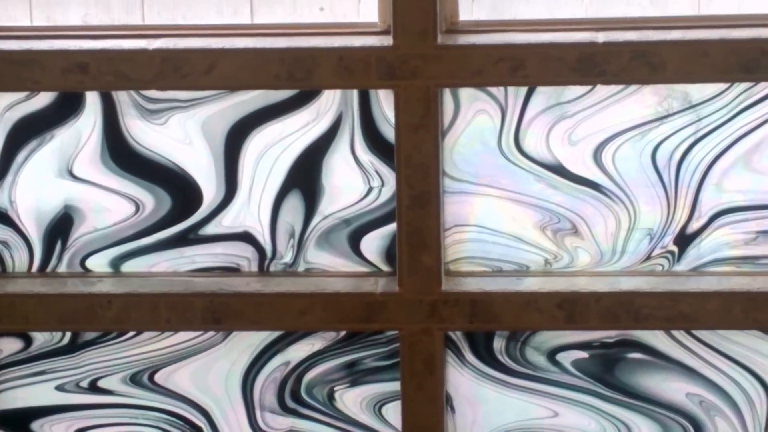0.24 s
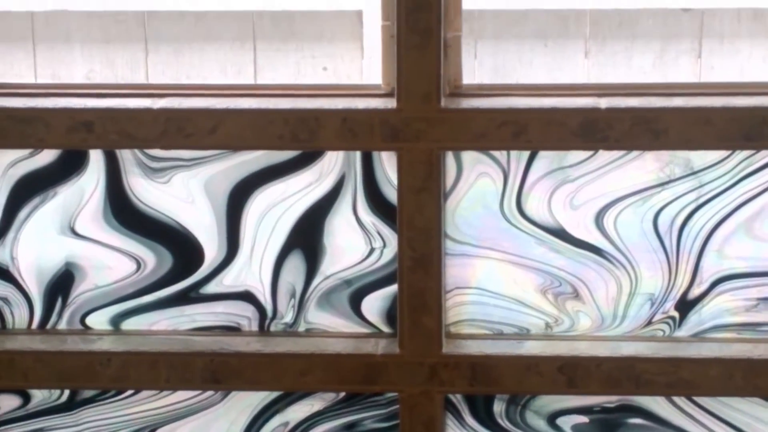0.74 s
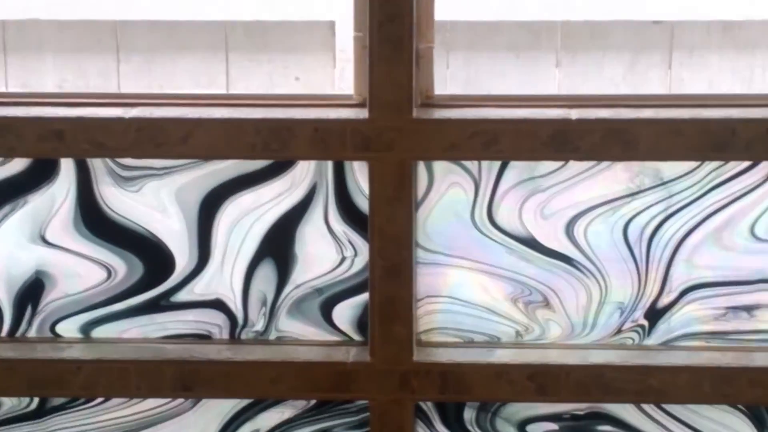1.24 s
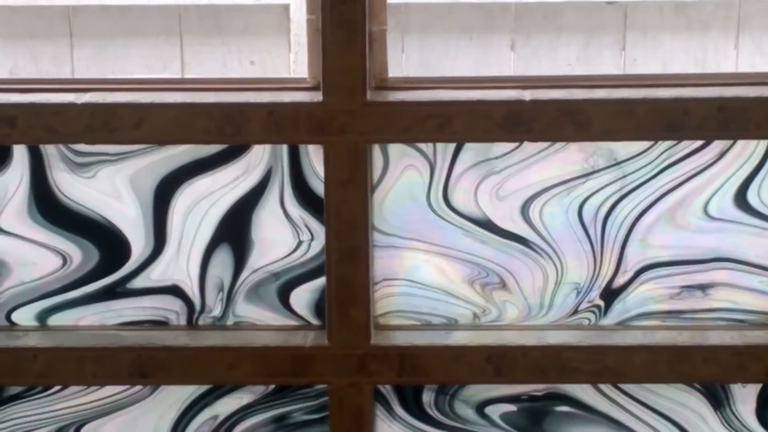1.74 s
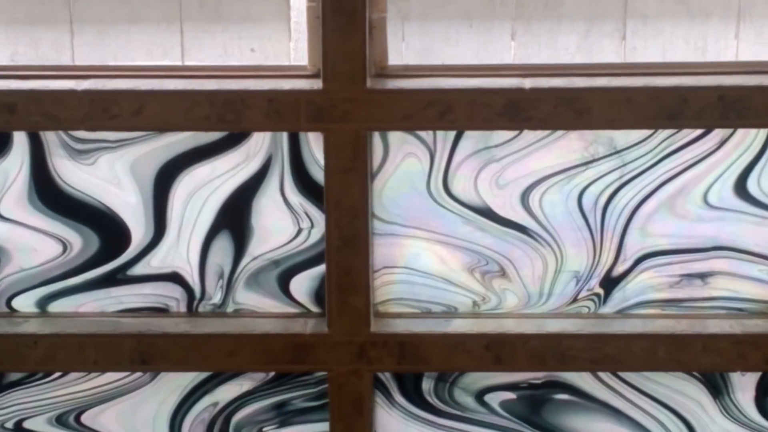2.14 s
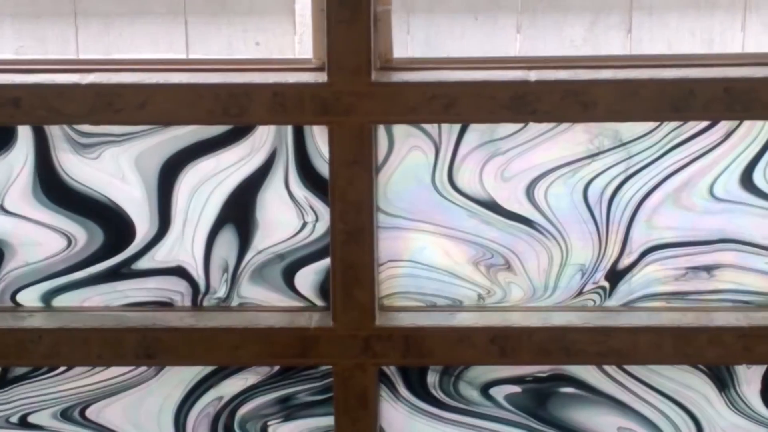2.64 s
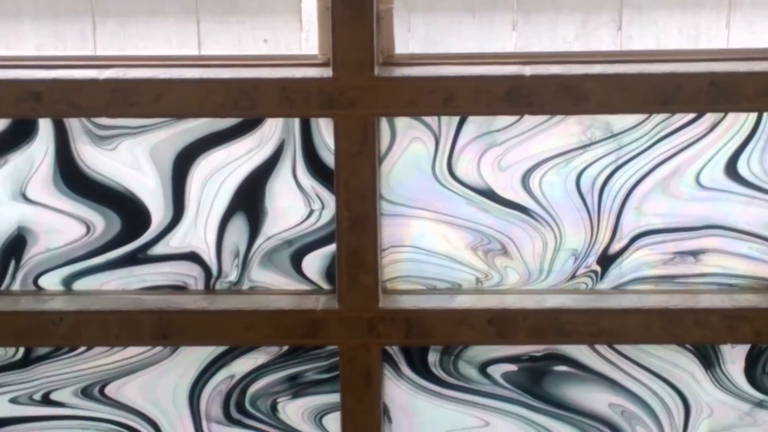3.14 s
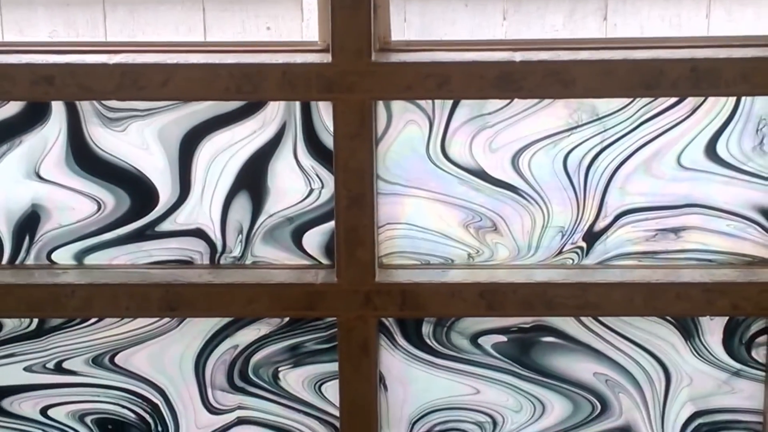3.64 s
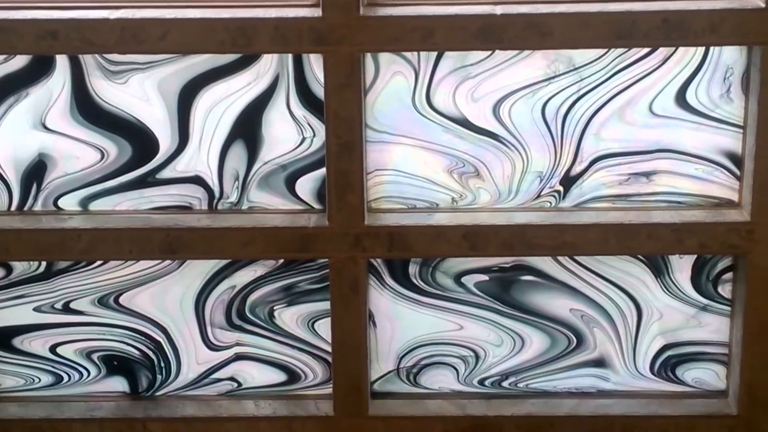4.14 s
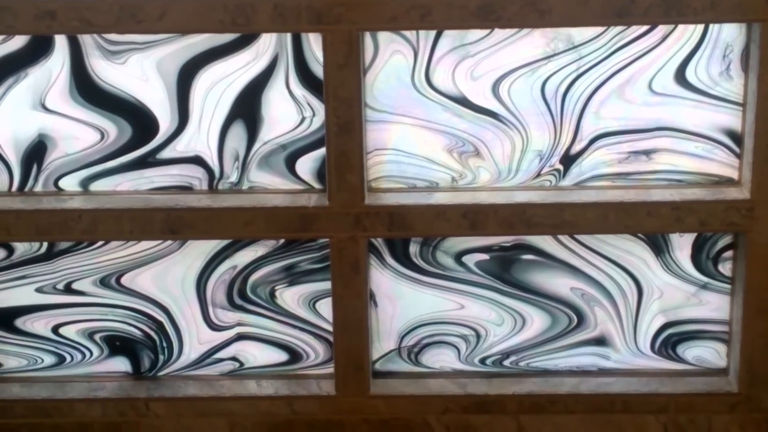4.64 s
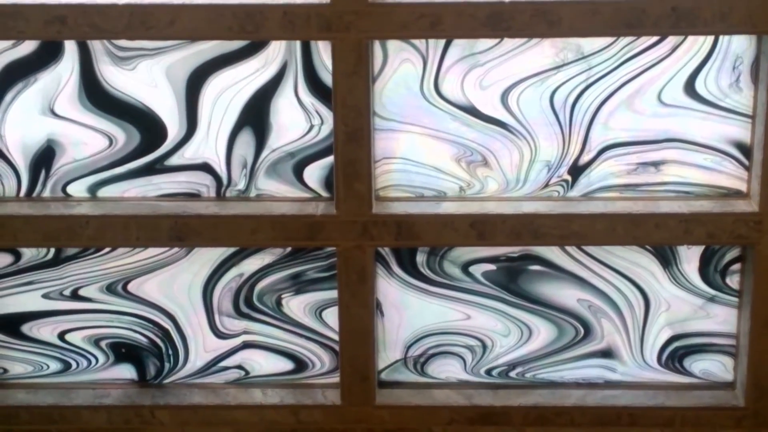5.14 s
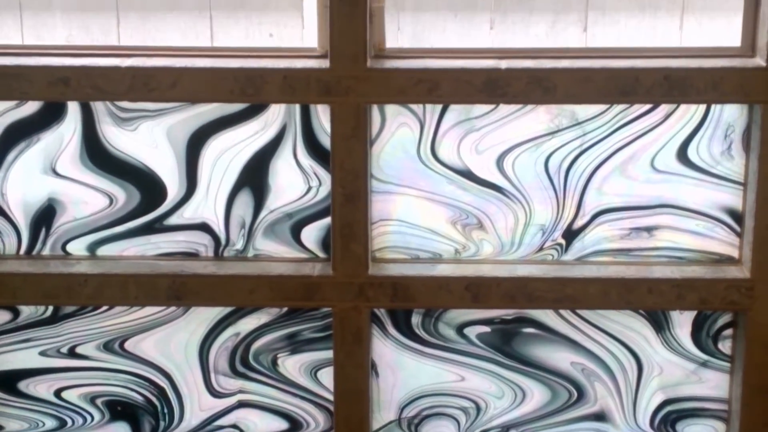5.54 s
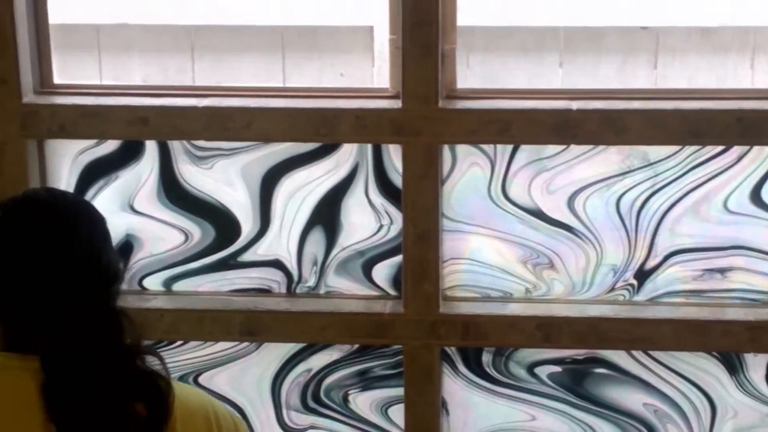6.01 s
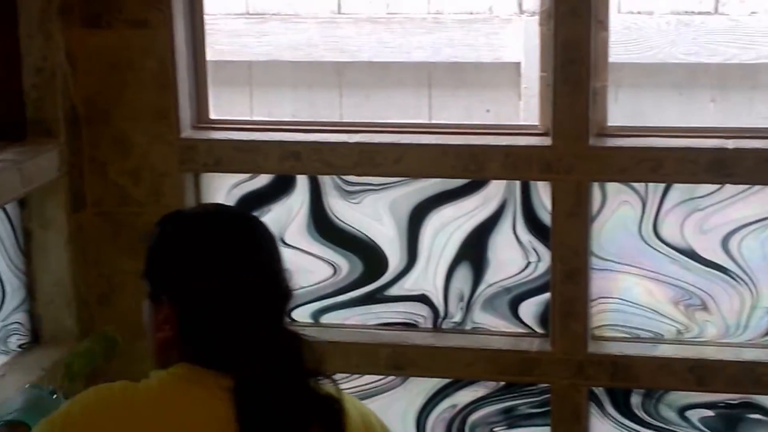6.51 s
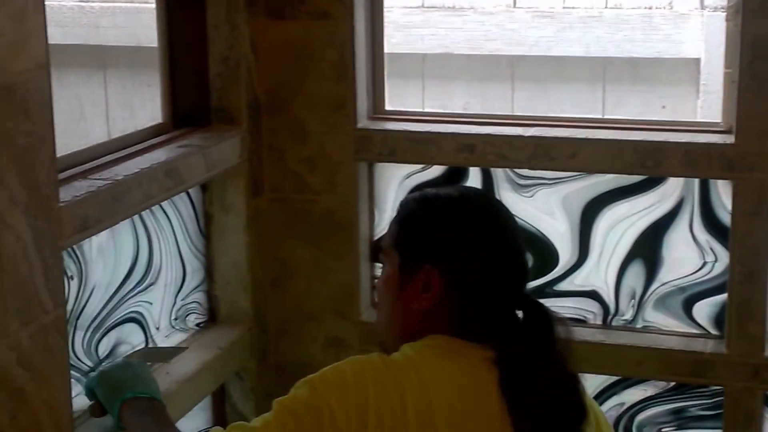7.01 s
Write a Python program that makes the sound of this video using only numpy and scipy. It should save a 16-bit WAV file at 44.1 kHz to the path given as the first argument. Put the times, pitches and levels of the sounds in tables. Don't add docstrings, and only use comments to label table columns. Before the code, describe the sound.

Gritty cloth strokes scrape and hiss on wood, with hollow knocks as the hand lands. The strongest rub comes early, followed by sparse faint brushing, small ticks, soft bumps and thin squeaks. A bright double metal knock with short chatter comes close to the end, then near quiet. Bare room echo, faint mains hum and low rumble, plain mono phone sound.

```python
import sys
import numpy as np
from scipy import signal
from scipy.fft import rfft, irfft, next_fast_len
from scipy.io import wavfile
from scipy.ndimage import uniform_filter1d

SR = 44100
rng = np.random.default_rng(int(sys.argv[2]) if len(sys.argv) > 2 else 0)


def decibels_to_gain(level_db):
    exponent = np.asarray(level_db, float) / 20
    return 10 ** exponent


def log_audio(samples):
    frames = np.atleast_2d(samples).T
    limited = np.clip(frames, -1, 1)
    pcm = np.round(limited * 32767).astype(np.int16)
    wavfile.write(sys.argv[1], SR, pcm)


N = 320607
T = np.arange(N) / SR
SIZE = next_fast_len(N + SR // 4)
ON_LEDGE_S = 4.5


def evened(x):
    return x / np.sqrt(np.mean(x ** 2) + 1e-20)


def read(points, hz):
    f, value = np.transpose(points)
    return np.interp(np.log(hz + 1), np.log(f + 1), value)


def add(mix, s, sound):
    part = mix[round(s * SR):][:len(sound)]
    part += sound[:len(part)]


def curve(rows, column):
    rows = np.array(rows)
    inside = (T >= rows[0, 0]) * (T < rows[-1, 0])
    return decibels_to_gain(np.interp(T, rows[:, 0], rows[:, column])) * inside


def played(times, holds, levels_db, rise_db, fall_db, sag_db=0):
    coarse = T[::64]
    late = coarse[:, None] - times
    rise = rise_db * np.minimum(late, 0)
    sag = sag_db * np.clip(late, 0, holds)
    fall = fall_db * np.maximum(late - holds, 0)
    power = np.sum(decibels_to_gain(levels_db + rise - sag - fall) ** 2, axis=1)
    return np.interp(T, coarse, np.sqrt(power))


def coloured(x, spectrum):
    gain = decibels_to_gain(read(spectrum, np.fft.rfftfreq(SIZE, 1 / SR)))
    return evened(irfft(rfft(x, SIZE) * gain, SIZE)[:N])


def response(modes):
    hz = np.fft.rfftfreq(SIZE, 1 / SR)
    total = 0
    for k, (centre, width, db) in enumerate(modes):
        damping = 1j * hz * width
        total = total + (-1) ** k * decibels_to_gain(db) * damping / (centre ** 2 - hz ** 2 + damping)
    return total


def body(x, modes):
    return evened(irfft(rfft(x, SIZE) * response(modes), SIZE)[:N])


def driven(force, modes, widen):
    low, high = modes[0][0], modes[-1][0]
    skirt = [(np.sqrt(low * high), widen * (high - low), 0)]
    transfer = response(modes) * response(skirt)
    transfer = transfer / np.sqrt(np.mean(abs(transfer) ** 2))
    return irfft(rfft(force, SIZE) * transfer, SIZE)[:N]


def resonate(x, hz, width):
    turn = np.exp(2j * np.pi * np.cumsum(hz * np.ones(len(x))) / SR)
    r = np.exp(-np.pi * width / SR)
    smooth = signal.lfilter([1 - r], [1, -r], x / turn + 1e-18)
    return 2 * (turn * smooth).real


def slips(per_s, spread_db):
    size = decibels_to_gain(spread_db * np.minimum(rng.exponential(1, N), 4))
    return evened(size * rng.standard_normal(N) * (rng.random(N) < per_s / SR))


def flutter(hz, depth_db):
    span = int(SR / hz)
    slow = uniform_filter1d(uniform_filter1d(rng.standard_normal(N), span), span)
    return evened(decibels_to_gain(depth_db * evened(slow)))


def patchy(x, depth_db):
    z = signal.stft(x, nperseg=512)[2]
    across_hz = uniform_filter1d(rng.standard_normal(z.shape), 4, 0)
    patches = evened(uniform_filter1d(across_hz, 6, 1))
    return evened(signal.istft(z * decibels_to_gain(depth_db * patches), nperseg=512)[1][:N])


# frequency in Hz, level in dB per Hz.
AIR = [(12, -1), (20, 5), (59, 1), (129, -11), (186, -11), (239, -16), (282, -16.5), (324, -13.5),
       (633, -20), (1240, -26), (2100, -22), (3460, -31.5), (6570, -32), (9180, -35), (15600, -33.5)]
LINE_HZ = (60, 120.8)
# start in seconds, hold in seconds, lower line in dB, upper line in dB.
SWELLS = [(0, 0.021, -46.5, -69), (0.945, 0.69, -55, -58), (1.573, 0.089, -45.5, -63),
          (1.99, 0.024, -51, -46), (2.203, 0.24, -73, -50), (2.873, 0.018, -57, -50),
          (3.43, 0.15, -49, -74), (4.632, .04, -59, -48), (5.0, .02, -49, -62), (5.226, .03, -48.5, -64),
          (5.623, 0.037, -55, -69), (6.146, 0.027, -62, -73), (6.56, .1, -53, -67),
          (7.197, .07, -56.5, -63)]


def building():
    air = decibels_to_gain(-56.5) * coloured(rng.standard_normal(N), AIR) * flutter(4.5, 0.81)
    line_db, rise_db_per_s, fall_db_per_s = (-59.5, -63.5), (79, 300), (66, 43)
    rows = np.transpose(SWELLS)
    for k, hz in enumerate(LINE_HZ):
        swell = played(*rows[:2], rows[2 + k], rise_db_per_s[k], fall_db_per_s[k])
        wavering_hz = hz * flutter(14.5, 0.53)
        line = np.sin(2 * np.pi * np.cumsum(wavering_hz) / SR) * flutter(31.0, 3.5)
        air += decibels_to_gain(-4.0) * evened(line) * np.hypot(decibels_to_gain(line_db[k]), swell)
    return air


# start in seconds, level in dB, frequency in Hz.
BUMPS = [
    (.67, -41, 300),
    (1.54, -42, 170),
    (5.455, -44, 220),
    (5.856, -33, 230),
]
# start in seconds, level in dB, frequency in Hz.
TICKS = [
    (3.838, -40, 1000),
    (4.142, -35, 1600),
    (5.853, -39, 500),
]
# start in seconds, level in dB, frequency in Hz, length in seconds.
PINGS = [
    (0.037, -61.5, 900, 0.044),
    (0.111, -62, 900, 0.054),
    (0.206, -61.5, 900, 0.049),
    (0.323, -68, 900, .05),
    (0.544, -67, 900, 0.042),
    (6.331, -63, 905, 0.037),
]
# time in seconds, frequency in Hz, level in dB.
SQUEAKS = [
    [(5.11, 7960, -85), (5.16, 8000, -77), (5.2, 8000, -63)],
    [(5.42, 6800, -70), (5.46, 6600, -73), (5.55, 6770, -73), (5.7, 6500, -64)],
    [(7.06, 4700, -80), (7.13, 5600, -83), (7.18, 6700, -73), (7.27, 7200, -75)],
]


def small_sounds():
    out, t = np.zeros(N), T[:SR // 10]
    for s, db, hz in BUMPS:
        u = (t - .012) * hz * 4
        dip, rebound = np.exp(-u ** 2 / 2), .6 * np.exp(-(u - 3) ** 2 / 5)
        add(out, s - .012, decibels_to_gain(db) * (rebound - dip))
    for s, db, hz in TICKS:
        add(out, s, decibels_to_gain(db) * np.sin(2 * np.pi * hz * t) * np.exp(-t / 0.001))
    for s, db, hz, length in PINGS:
        swell = np.sin(np.pi * np.minimum(t / length, 1))
        add(out, s, decibels_to_gain(db) * np.sin(2 * np.pi * hz * t) * swell)
    for rows in SQUEAKS:
        hz = np.interp(T, *np.transpose(rows)[:2])
        whistle = np.sin(2 * np.pi * np.cumsum(hz) / SR) * flutter(250, 4)
        out += evened(whistle) * uniform_filter1d(curve(rows, column=2), 800)
    return out


# start in seconds, hold in seconds, chatter in dB,
# steel left free to ring in dB, drag hiss in dB.
BLADE = [
    (6.452, 0.0031, -33.5, -5, -6.5),
    (6.464, .006, -32.5, 9, -20),
    (6.53, .01, -58, 0.5, 5),
    (6.551, 0.052, -47, 5.5, -3.5),
    (6.741, 0.028, -61.5, 10, -1),
]
# frequency in Hz, width in Hz, level in dB.
SILL = [(300, 60, -11), (800, 90, -6), (880, 70, -6), (1015, 60, -1)]
# frequency in Hz, width in Hz, level in dB.
FLEX = [(1430, 70, 0), (1760, 70, -7), (1880, 60, -5), (2150, 200, -8)]
# frequency in Hz, width in Hz, level in dB.
RING = [(2330, 80, -7), (2430, 60, -6), (2665, 95, -1), (2950, 220, -8)]
# frequency in Hz, width in Hz, level in dB.
STEEL = [(3680, 200, 1), (4000, 270, 7), (4420, 94, 3), (5000, 150, 4.5), (6100, 180, -7), (6680, 91, 7),
         (7200, 71, 6), (7800, 130, -22), (8300, 180, -5.5), (10600, 290, 0), (13400, 400, -7)]


def blade():
    chatter, drag = slips(6000, 1.5), slips(9000, 1)
    steel = evened(body(drag, STEEL) + decibels_to_gain(-3) * coloured(drag, HISS))
    s, hold, db, free, dragged = np.transpose(BLADE)

    def touch(extra_db, fall_db_per_s):
        return played(s, hold, db + extra_db, 246, fall_db_per_s)

    wood = driven(chatter * touch(-4.2 - free, 179), SILL, 5.2)
    shake = touch(0, 195)
    flex = driven(chatter * shake, FLEX, 1.5)
    flex += decibels_to_gain(-6) * coloured(chatter, SCRAPE) * shake
    ring = decibels_to_gain(-4.0) * driven(chatter * touch(free - 3.2, 241), RING, 0.8)
    landing = np.clip((T - BLADE[0][0] + .004) / .016, 0, 1)
    return landing * (steel * touch(dragged, 255) + wood + flex + ring)


# time in seconds, resting pressure in dB, scrape centre in Hz where it touches.
HAND = [(0, -71.5, 1070), (.3, -66.5, 1180), (.46, -59, 1700), (.73, -68.5, 1150), (.99, -62.5, 1850),
        (1.5, -64, 1450), (1.85, -49.5, 1810), (2.3, -44.5, 1350), (2.5, -85, 1590), (2.93, -92, 1420),
        (3.2, -62, 2100), (3.8, -63.5, 1570), (4.0, -73, 1900), (4.55, -69.5, 1760), (5.0, -65, 1790),
        (5.7, -68.5, 2080), (6.3, -68, 1700), (7.27, -74, 1850)]
REST_DB = (-3, -5.5, -7, -22)
# start in seconds, hold in seconds,
# pressure in dB, heft in dB, speed in dB.
LANDED = [
    (0.448, 0.0069, -49, 3, -12),
    (1.204, 0.085, -43.5, -0.5, -9.5),
    (1.743, 0.0055, -37, -7.5, -7.5),
    (1.93, 0.024, -37, 1.5, -5.5),
    (1.984, 0.11, -35.5, 4, -3.5),
    (2.235, 0.17, -32, 0.5, -9.5),
    (3.729, 0.012, -53, -1.5, -4.5),
    (2.403, 0.025, -33.5, -0.5, -10),
]
# start in seconds, hold in seconds,
# pressure in dB, heft in dB, speed in dB.
SWEPT = [(0.97, 0.0065, -60, -9, -1), (1.8, 0.06, -58, -10, -16), (2.308, 0.018, -34, 7, -20),
         (2.377, 0.0049, -38, -13, 4), (2.837, 0.013, -49.5, 4.5, -2.5), (2.897, 0.029, -36.5, -2.5, -9),
         (3.163, 0.046, -58.5, -21, -1), (3.452, 0.0073, -61, 6.5, 0.5), (3.607, .01, -59.5, 2, -2.5),
         (4.08, 0.046, -59.5, -17, -7.5), (4.155, 0.042, -53.5, -12, -9.5), (4.246, 0.22, -65, -2.5, -1.5),
         (4.775, 0.044, -54.5, -11, -2.5), (4.858, 0.018, -58.5, -15, -12), (5.12, 0.0091, -83, -18, -7),
         (6.086, 0.009, -70, -18, -5), (6.312, .01, -76, -15, 9.5), (7.16, 0.097, -69.5, 4, -5)]
# start in seconds, hold in seconds,
# pressure in dB, heft in dB, speed in dB.
STRUCK = [
    (0.727, 0.06, -49.5, 9.5, -4.5),
    (1.086, 0.065, -53, 1, -8.5),
    (1.615, 0.057, -53, 3.5, -5),
    (5.207, 0.045, -44.5, 1.5, -2.5),
    (5.571, 0.035, -49.5, 4.5, -1.5),
]
RISE_SPEED = (0.91, 1.8, 0.82, 2)


def pressing():
    sag_db_per_s, fall_db_per_s = (-4.5, 48, 12, 25), (129.6, 204, 165, 144)
    force = decibels_to_gain(np.array(REST_DB)[:, None]) * curve(HAND, column=1)
    # its rows, rise in dB per second, knock in dB
    for rows, rise_db, knock_db in ((LANDED, 501, -12.5), (SWEPT, 166, -11.5), (STRUCK, 2500, -1.5)):
        s, hold, db, heft, speed = np.transpose(rows)
        extras_db = (0, heft, speed, knock_db + 0.58 * heft)
        for k, extra_db in enumerate(extras_db):
            stroke = played(s, hold, db + extra_db, rise_db * RISE_SPEED[k], fall_db_per_s[k], sag_db_per_s[k])
            force[k] = np.hypot(force[k], stroke)
    return force


# start in seconds, boom in dB, slap in dB, crack in dB, knock in dB.
THUMPS = [(0.448, -38.5, -37.5, -33.5, -38), (0.725, -29.5, -44, -50, -28), (1.092, -37.5, -56, -60, -31.5),
          (1.189, -32, -73, -42, -49), (1.619, -41.5, -50, -55, -46), (1.724, -44, -54, -32.5, -52),
          (1.964, -23.5, -60, -63, -30), (2.19, -18, -43, -28, -19), (2.87, -25, -31.5, -64, -28.5),
          (3.724, -48, -48, -68, -61), (4.609, -39.5, -61, -50, -54), (5.198, -30, -67, -63, -35),
          (5.567, -36, -67, -54, -32)]


def thump(boom, knock, scrape_force, hiss_force):
    t = T[:SR // 5]
    blow = np.sin(np.pi * t[:SR // 1000] * 1000)
    slap = (1 - np.exp(-t / 0.0092)) * np.exp(-t / 0.02)
    crack = (1 - np.exp(-t / 0.0058)) * np.exp(-t / 0.037)
    for s, boom_db, slap_db, crack_db, knock_db in THUMPS:
        add(boom, s, decibels_to_gain(boom_db - 8.0) * blow)
        add(knock, s, decibels_to_gain(knock_db - 15.5) * blow)
        add(scrape_force, s, decibels_to_gain(slap_db - 3.0) * slap)
        add(hiss_force, s, decibels_to_gain(crack_db - 16.5) * crack)


# frequency in Hz, level in dB per Hz.
SCRAPE = [(500, -1), (850, 0.5), (1060, -1), (1140, -1), (1470, -4), (2010, -2), (2950, 0), (4600, -9.5),
          (5980, -42), (10100, -120)]
# frequency in Hz, width in Hz, level in dB.
PANES = [(900, 42, 27), (940, 14, -22), (1204, 43, 24), (1470, 110, 12), (1750, 31, -20), (2020, 20, -28),
         (2300, 85, -1)]


def cloth_scrape():
    rows = np.array(HAND)
    centre_hz = np.interp(T, rows[:, 0], rows[:, -1])
    wide = coloured(slips(4000, 0.5), SCRAPE)
    panes = body(wide, PANES) * (T < ON_LEDGE_S)
    patch = evened(resonate(resonate(wide, centre_hz, 1370), centre_hz, 1370))
    return patchy(evened(decibels_to_gain(-2.5) * wide + decibels_to_gain(-8) * panes + decibels_to_gain(8.0) * patch), 3)


# frequency in Hz, level in dB per Hz.
HISS = [(1880, -24), (3200, -12.5), (4400, -11.5), (7370, -5.5), (8760, -10), (9610, -11.5), (10500, -14),
        (12600, -16), (15600, -20)]


def cloth_hiss(force):
    hiss = patchy(coloured(slips(12000, 0.34), HISS), 2.56)
    high_pass = signal.butter(2, 8630, "high", fs=SR, output="sos")
    top = signal.sosfiltfilt(high_pass, hiss)
    return hiss + top * ((force / decibels_to_gain(-45.5)) ** 0.67 - 1)


# frequency in Hz, width in Hz, level in dB.
BOOM = [(188, 24, -2), (206, 20, -2), (246, 18, 0)]
# frequency in Hz, width in Hz, level in dB.
KNOCK = [(318, 30, 0), (356, 25, 0), (400, 35, -1), (467, 25, -3), (600, 70, -13), (765, 40, -10)]
# frequency in Hz, width in Hz, level in dB.
LEDGE = [(136, 73, 0.5), (211, 91, 3), (335, 73, -0.5), (397, 180, -8)]


def frame():
    force = pressing() * decibels_to_gain([[-2], [-2], [-1], [-2]]) * flutter(27, 0.34)
    scrape_force, boom_force, hiss_force, knock_force = force
    rumble = slips(2000, 2.33)
    boom, knock = rumble * boom_force, rumble * knock_force
    thump(boom, knock, scrape_force, hiss_force)
    cloth = cloth_scrape() * scrape_force + cloth_hiss(hiss_force) * hiss_force
    early = T < ON_LEDGE_S
    wood = driven(boom * early, BOOM, 2) + driven(knock * early, KNOCK, 0.7)
    ledge = decibels_to_gain(-4.0) * driven((boom + knock) * ~early, LEDGE, 3.7)
    return cloth + wood + ledge


# frequency in Hz, time to fall 60 dB in seconds.
ROOM = [(120, 0.63), (320, 0.49), (840, 0.41), (2210, 0.24), (5820, 0.34), (12000, 0.22)]


def room(x):
    taps = np.zeros(SR)
    at = np.arange(200, SR - 20, 20)
    taps[at + rng.integers(0, 20, len(at))] = rng.choice([-1., 1.], len(at))
    hz, t, z = signal.stft(taps, SR, nperseg=256)
    decay = decibels_to_gain(-60 * t / read(ROOM, hz)[:, None])
    tail = signal.istft(z * decay, SR, nperseg=256)[1]
    return signal.fftconvolve(x, tail / np.linalg.norm(tail))[:N]


def scene():
    wood, steel, small = frame(), blade(), small_sounds()
    echo = room(decibels_to_gain(-5.5) * wood + decibels_to_gain(-8) * steel + decibels_to_gain(-30) * small)
    mono = wood + steel + small + echo + building()
    return np.array([mono, mono])


def low_pass(x):
    return signal.sosfilt(signal.butter(12, 15740, fs=SR, output="sos"), x)


# centre in seconds, length in seconds,
# bar over the local mean in dB that a bin must pass to stay, lowest frequency hit in Hz.
THINNED = [(.573, .028, 1.5, 3000), (.978, .028, 1, 3000), (1.255, .028, 1, 3000), (1.341, .028, 1, 3000),
           (1.863, .042, 2.5, 3100), (1.885, .042, 1, 3100), (2.45, .028, 2.5, 3000),
           (2.578, .028, 2.5, 3000), (2.908, .042, 2, 2900), (2.93, .042, 1, 2900), (3.154, .028, 1, 3000),
           (3.303, .028, 1.5, 3000), (3.815, .028, 1.5, 2600), (4.285, .028, 1.5, 3000),
           (4.733, .028, 1.5, 3000), (5.757, .028, 2, 2800)]


def record(dry):
    x = dry[0].copy()
    for s, length, above_db, low_hz in THINNED:
        size = int(length * SR)
        start = int(s * SR) - size // 2
        at = slice(start, start + size)
        window = np.sqrt(signal.windows.tukey(size, .026 / length))
        z, hz = rfft(x[at] * window), np.fft.rfftfreq(size, 1 / SR)
        power = abs(z) ** 2
        level = np.sqrt(uniform_filter1d(power, 3))
        bar = np.sqrt(uniform_filter1d(power, 70)) * decibels_to_gain(above_db + 3 * (hz > 9600))
        lost = (level < bar) * (hz > low_hz)
        x[at] -= irfft(z * lost, size) * window
    below_top = np.fft.rfftfreq(SIZE, 1 / SR) < 15720
    x = irfft(rfft(x, SIZE) * below_top, SIZE)[:N]
    return low_pass(np.array([x, x]))


dry = scene()
out = record(dry)
log_audio(out)
```